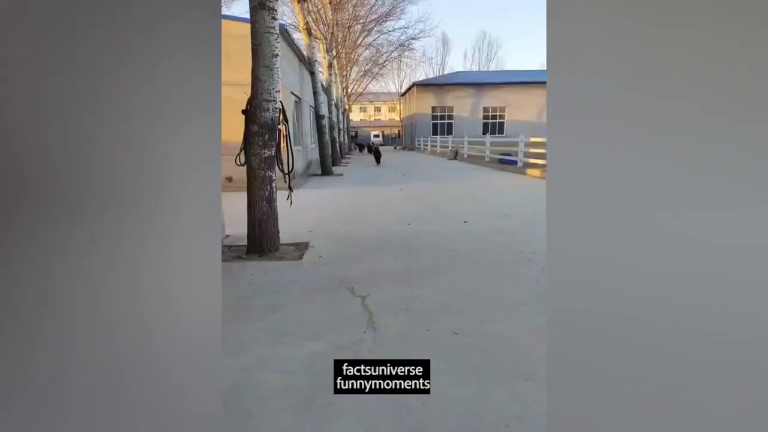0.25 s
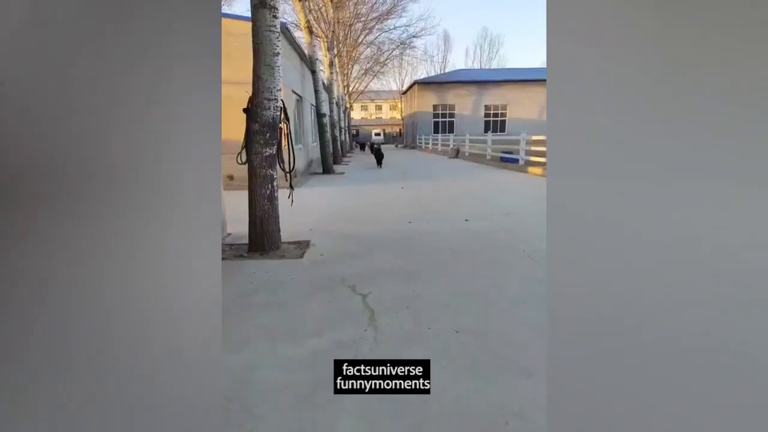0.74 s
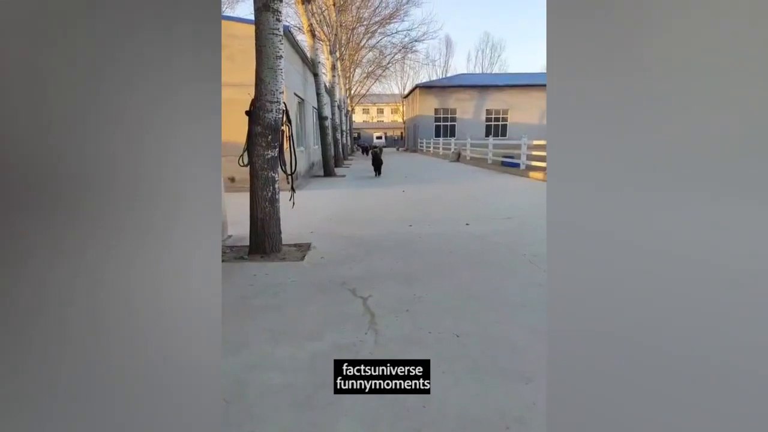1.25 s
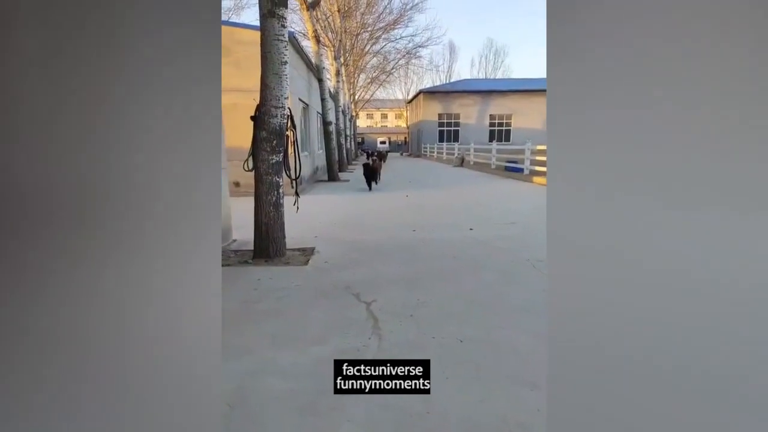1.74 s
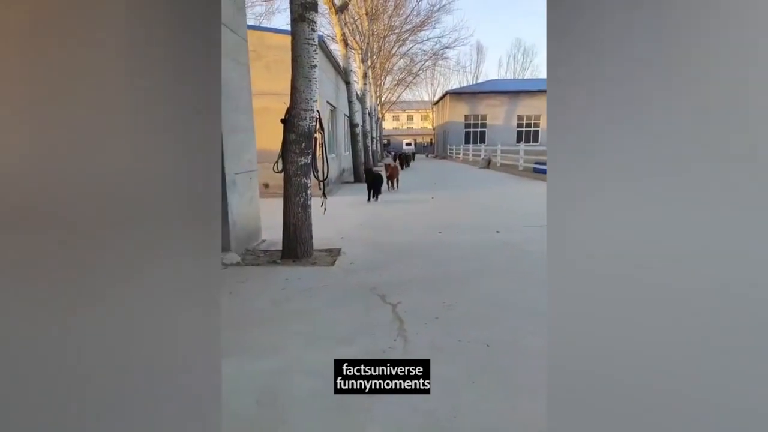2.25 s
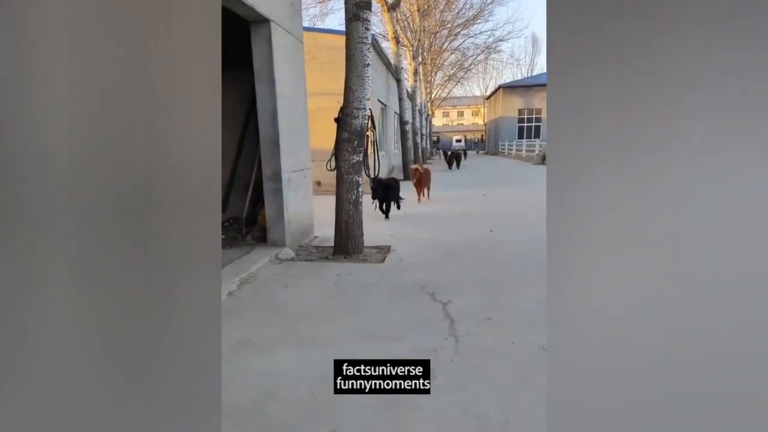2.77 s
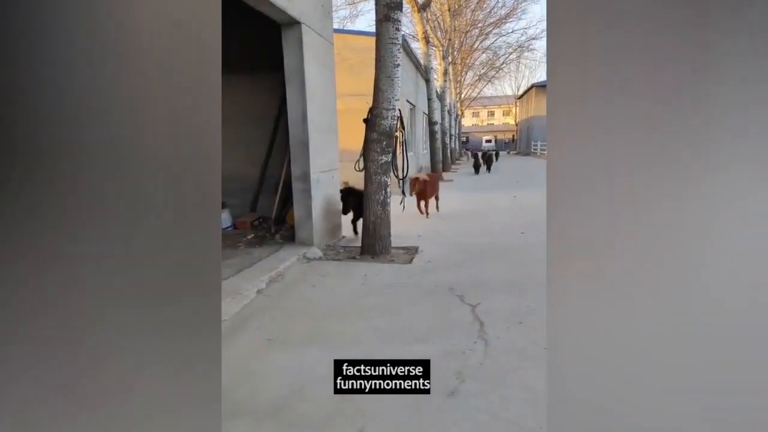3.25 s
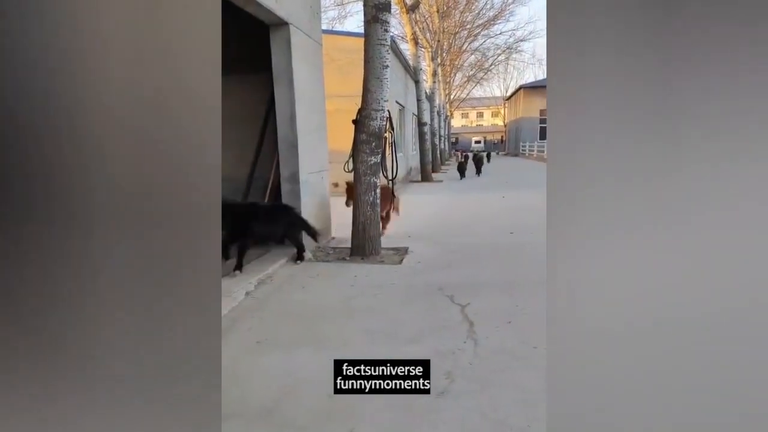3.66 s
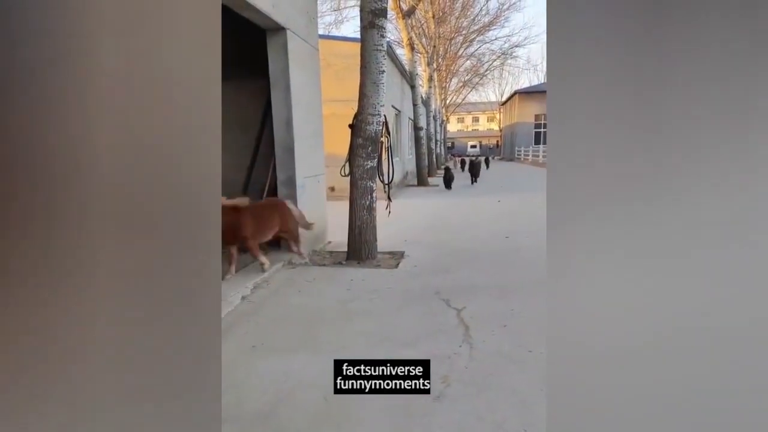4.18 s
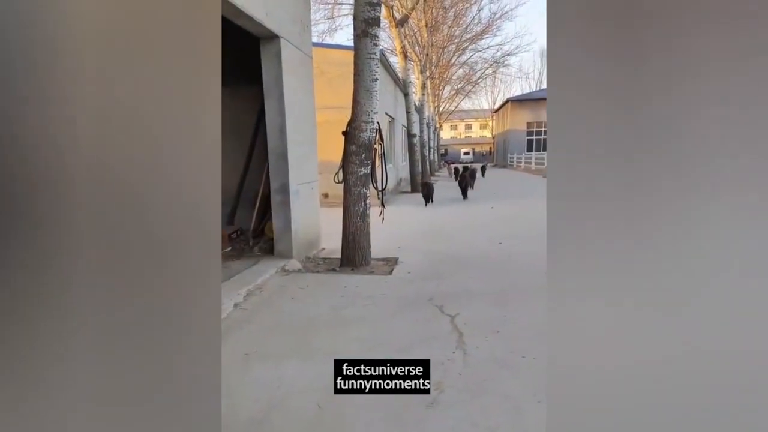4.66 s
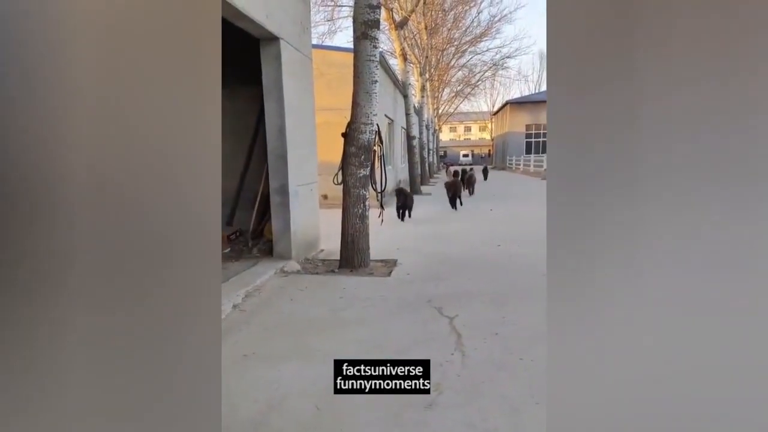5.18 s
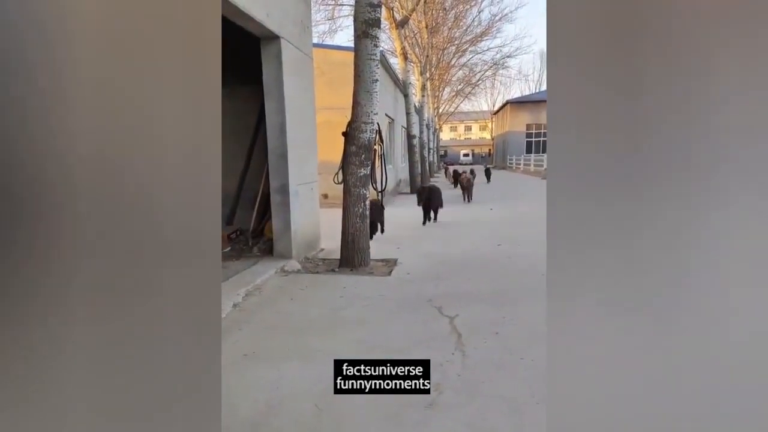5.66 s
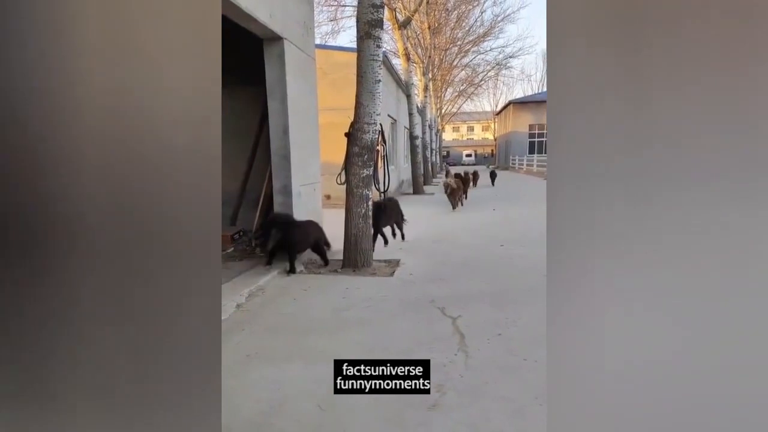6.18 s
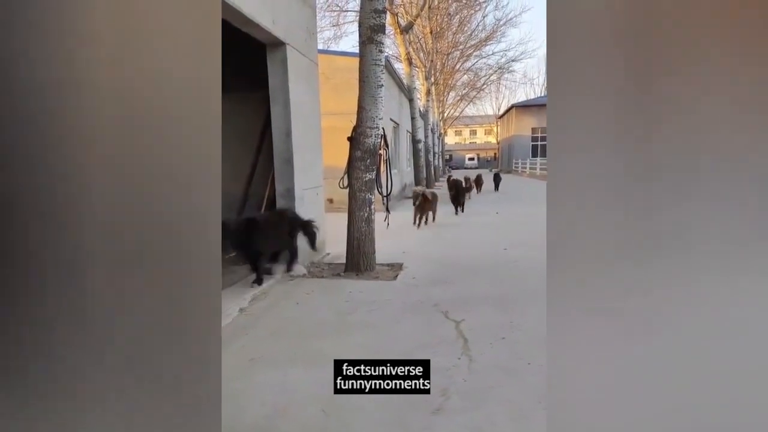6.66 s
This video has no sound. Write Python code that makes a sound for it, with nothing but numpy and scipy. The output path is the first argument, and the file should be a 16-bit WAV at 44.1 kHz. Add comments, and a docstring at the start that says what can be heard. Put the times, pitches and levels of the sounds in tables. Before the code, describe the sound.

A brief echoing corridor rush, silence, a low thump, then small horses' hooves clack along concrete and thud hollowly over a sill.

```python
"""Hooves clack and scuff along a concrete lane, with hollow thuds as small horses step onto a stable sill.
A short rush of noise in an echoing corridor comes first, then a silence and the thump of the input waking.
Hooves are uneven blows through broad resonances; thuds are sine pushes with a rough ring.
Delays between walls throw the near hooves back; coloured noise makes the far herd, rumble and corridor."""
import sys
import numpy as np
from scipy import signal
from scipy.fft import rfft, irfft, next_fast_len
from scipy.io import wavfile

SR = 44100
rng = np.random.default_rng(int(sys.argv[2]) if len(sys.argv) > 2 else 0)


def wrap_up_sound(samples):
    """Save the sound to the file named by the first command line argument, as 16-bit audio."""
    columns = np.atleast_2d(samples).T
    # keep every value between -1 and 1, then stretch to whole-number steps
    tamed = np.clip(columns, -1, 1)
    steps = np.round(tamed * 32767).astype(np.int16)
    wavfile.write(sys.argv[1], SR, steps)


N = 304951

# far herd spectrum, shape only: (frequency [Hz], density [dB per Hz])
HERD_SPECTRUM = [(240, -38), (400, -1.5), (763, 0), (1420, -3), (2220, -4), (3250, -6), (4300, -11),
                 (6560, -13), (10600, -21), (11500, -3), (22000, -120)]

CORRIDOR_END_S, SWITCH_ON_S = .1835, .3344


def from_db(db):
    """Decibels to gain."""
    return 10 ** (np.asarray(db) / 20)


def rms_one(x):
    """Scale to rms 1."""
    return x / np.sqrt(np.mean(x ** 2) + 1e-20)


def in_time(rows):
    """Interpolate table columns at every sample."""
    s, *columns = np.transpose(rows)
    return [np.interp(np.arange(N) / SR, s, c) for c in columns]


def drift(corner_hz):
    """Slow noise of rms 1: two equal poles at corner_hz, run at SR / 40 and interpolated."""
    step, settle = 40, 2000
    r = np.exp(-2 * np.pi * corner_hz * step / SR)
    noise = rng.standard_normal(N // step + settle + 2)
    slow = signal.lfilter([1], [1, -2 * r, r * r], noise)[settle:]
    return np.interp(np.arange(N) / step, np.arange(len(slow)), rms_one(slow))


def resonate(x, hz, width_hz):
    """One two-pole resonance, gain near 1 on top."""
    r = np.exp(-np.pi * width_hz / SR)
    zeros = (1 - r * r) / 2 * np.array([1, 0, -1])
    poles = [1, -2 * r * np.cos(2 * np.pi * hz / SR), r * r]
    return signal.lfilter(zeros, poles, x)


def body(force, hz, width_hz):
    """Two resonances in series, the second twice as wide: steeper skirts."""
    return resonate(resonate(force, hz, width_hz), hz, 2 * width_hz)


def high_pass(x, hz):
    """Cut the bass with a fourth-order slope."""
    return signal.sosfilt(signal.butter(4, hz, "high", fs=SR, output="sos"), x)


def bump(t, rise_ms, fall_ms):
    """Swell with its top at t = 0, 6 dB down after the rise and fall times."""
    return .5 ** ((1000 * t / np.where(t < 0, rise_ms, fall_ms)) ** 2)


def add(out, s, sound):
    """Mix a sound in at time s."""
    i = round(s * SR)
    out[i:i + len(sound)] += sound[:N - i]


def coloured(x, spectrum):
    """Filter a signal by a spectrum table, log-interpolated in frequency; rms 1."""
    size = next_fast_len(N)
    hz = np.arange(1, size // 2 + 2) * SR / size
    table_hz, level_db = np.transpose(spectrum)
    gain = from_db(np.interp(np.log(hz), np.log(table_hz), level_db, left=-90, right=-90))
    return rms_one(irfft(rfft(x, size) * gain, size)[:N])


def rumble(level_db):
    """Wavering low noise over a steady deep hum of the yard, itself noise."""
    # low rumble, shape only: (frequency [Hz], density [dB per Hz])
    low_spectrum = [(53, -27), (90, -0.5), (163, 0.5), (296, -4), (447, -15.5), (600, -19), (780, -20.5),
                    (1320, -120)]
    # deep hum, shape only: (frequency [Hz], density [dB per Hz])
    deep_spectrum = [(13, -40), (22, -2), (100, -7), (130, -26), (220, -120)]
    waver_db, waver_hz, deep_db = 1.5, 16, -44.5
    low = coloured(rng.standard_normal(N), low_spectrum)
    deep = coloured(rng.standard_normal(N), deep_spectrum)
    return from_db(level_db + waver_db * drift(waver_hz)) * low + from_db(deep_db) * deep


def flicker(x):
    """Treble above each edge gets its own drifting level."""
    # flickering bands: (lower edge [Hz], drift [dB rms], drift corner [Hz])
    treble_bands = [(3800, 3, 51), (7100, 4.5, 50)]
    for hz, db, corner_hz in treble_bands:
        treble = signal.sosfiltfilt(signal.butter(2, hz, "high", fs=SR, output="sos"), x)
        x = x + (from_db(db * drift(corner_hz)) - 1) * treble
    return rms_one(x)


def far_herd(level_db):
    """Steps too far to tell apart: random ticks in several bands over a noise wash, level lumpy."""
    # tick resonances, each favouring one hoof resonance: centre [Hz]
    tick_bands_hz = [800, 2000, 3200, 6500]
    ticks_per_s_per_band, tail_s, tick_share = 90, 0.0017, 0.41
    lump_db, lump_hz = 1.4, 14  # steps bunch up
    r, ticks = np.exp(-1 / (tail_s * SR)), 0
    for hz in tick_bands_hz:
        strikes = rng.random(N) < ticks_per_s_per_band / SR
        steps = strikes * from_db(2.5 * rng.standard_normal(N))
        puffs = rms_one(signal.lfilter([1], [1, -r], steps + 1e-18))
        ticks = ticks + resonate(puffs * rng.standard_normal(N), hz, 0.23 * hz)
    mix = tick_share * rms_one(ticks) + (1 - tick_share) * rng.standard_normal(N)
    wash = flicker(coloured(mix, HERD_SPECTRUM))
    return from_db(level_db + lump_db * drift(lump_hz)) * wash


def far_steps():
    """Steps down the lane blurred by the walls: noise puffs in herd colour plus a clack resonance."""
    # distant steps: (time [s], puff level [dB])
    puffs = [(0.418, -46), (0.476, -44.5), (0.713, -46), (0.801, -43), (0.862, -47.5), (1.054, -42),
             (1.129, -42.5), (1.205, -48), (1.393, -40), (1.471, -42), (1.64, -56), (1.714, -46.5),
             (4.569, -47.5), (5.028, -44), (6.38, -41.5), (6.57, -46)]
    rise_ms, fall_ms, clack_hz, clack_width_hz = 13.2, 31.5, 2200, 650
    swell, lead_s = np.zeros(N), .04
    puff = bump(np.arange(6000) / SR - lead_s, rise_ms, fall_ms)
    for s, db in puffs:
        add(swell, s - lead_s, from_db(db) * puff)
    clack = rms_one(resonate(rng.standard_normal(N), clack_hz, clack_width_hz))
    grain = from_db(2.9 * drift(220))  # many small echoes in each puff
    wash = coloured(rng.standard_normal(N), HERD_SPECTRUM)
    return swell * grain * rms_one(wash + 1.1 * clack)


def ringing():
    """Hard far clacks leave the lane ringing: narrow-band noise with exponential fades."""
    # lane rings: (time [s], level before fade [dB], pitch [Hz], fade time constant [s])
    tones = [(.469, -43, 2110, 0.071), (.803, -38, 1980, 0.02), (1.818, -34.5, 2060, 0.032),
             (2.153, -39, 1960, 0.041), (3.158, -31, 2070, 0.016), (3.49, -34, 1930, 0.017)]
    width_hz = 450
    out, t = np.zeros(N), np.arange(9000) / SR
    for s, db, hz, fade_s in tones:
        tone = rms_one(body(rng.standard_normal(len(t)), hz, width_hz))
        add(out, s, from_db(db) * np.exp(-t / fade_s) * tone)
    return out


def scrape():
    """Broad friction noise with narrow squeaks of drifting level."""
    # squeaks in the scrape: (pitch [Hz], level re friction before drift [dB])
    squeaks = [(950, -15.5), (1450, -7), (1900, -9), (2320, -4)]
    friction_hz, friction_width_hz, squeak_width_hz = 2700, 1330, 65
    notes = np.zeros(N)
    for hz, db in squeaks:
        level = from_db(db + 4.0 * drift(30))
        notes += level * rms_one(body(rng.standard_normal(N), hz, squeak_width_hz))
    friction = rms_one(body(rng.standard_normal(N), friction_hz, friction_width_hz))
    return rms_one(friction + notes)


def corridor():
    """Wide noise wash over a mono boom, with a brighter scrape swelling inside it."""
    # corridor levels: (time [s], rush [dB], scrape [dB], boom [dB]); rush and scrape drift further
    levels = [(0, -40.5, -64, -31.5), (.036, -41, -55, -42), (.054, -36.5, -41, -33), (.07, -39, -35, -52),
              (.098, -39.5, -41.5, -49), (.112, -36.5, -37, -40), (.126, -39, -42, -44),
              (.14, -39, -40.5, -49), (.18, -45, -51, -51)]
    # rush spectrum, shape only: (frequency [Hz], density [dB per Hz])
    rush_spectrum = [(100, -30), (250, -8.5), (900, -10.5), (2280, -15.5), (5900, -26.5), (8030, -32),
                     (8670, -67.5), (10600, -25.5), (11500, -44), (22000, -120)]
    side_db, wide_from_hz, boom_hz, boom_width_hz = -2.5, 290, 89, 57
    rush_db, scrape_db, boom_db = in_time(levels)

    def wash():
        rush = from_db(rush_db) * coloured(rng.standard_normal(N), rush_spectrum)
        return rush + from_db(scrape_db) * scrape()

    mid = wash()
    side = from_db(side_db) * high_pass(wash(), wide_from_hz)
    boom = from_db(boom_db) * rms_one(body(rng.standard_normal(N), boom_hz, boom_width_hz))
    return from_db(0.93 * drift(25)) * (mid + side * [[1], [-1]]) + boom


def walls(x):
    """Early slaps, then dulled feedback delays between buildings, other lengths each side; mid, side."""
    # near-wall slaps: (delay [s], gain [dB])
    slaps = [(.0077, -20.5), (0.0195, -15.5), (0.0309, -20.5)]
    t60_s, dull_above_hz, tail_db = 0.18, 4500, -15  # decay time before dulling
    out, dull = np.zeros((2, N)), np.exp(-2 * np.pi * dull_above_hz / SR)
    for k, lag in enumerate((rng.uniform(0.011, 0.031, 12) * SR).astype(int)):
        loop, gain, state = x.copy(), from_db(-60 * lag / SR / t60_s), [0.]
        for i in range(lag, N, lag):
            back, state = signal.lfilter([gain * (1 - dull)], [1, -dull], loop[i - lag:i], zi=state)
            loop[i:i + lag] += back[:N - i]
        out[k % 2] += (loop - x) * (-1) ** (k // 2)
    early = np.zeros(N)
    for delay_s, db in slaps:
        add(early, delay_s, from_db(db) * x)
    return early + from_db(tail_db) * (out[0] + out[1]), from_db(tail_db) * (out[0] - out[1])


def taps():
    """Light toe taps of the horses behind: a noise click rings one resonance over a faint broad edge."""
    # toe taps: (time [s], peak level [dB], pitch [Hz])
    clicks = [(0.4184, -37, 2580), (0.469, -30.5, 1980), (0.983, -32, 1670), (1.564, -32.5, 2370),
              (1.8044, -28, 2480), (2.064, -31.5, 3100), (2.0794, -30, 1980), (2.09, -33.5, 2200),
              (2.4096, -29, 3020), (2.7806, -33, 2930), (3.26, -29, 1930), (3.3397, -30, 2370),
              (3.4457, -31, 2970), (3.65, -29, 1850), (3.679, -32, 1760), (3.809, -27, 2370),
              (3.8235, -29, 2540), (3.9056, -32, 2330), (4.2866, -27, 2410), (4.536, -31, 2280),
              (4.562, -29, 2000), (5, -32, 1680), (5.007, -36, 2410), (5.086, -33, 3550),
              (5.092, -31.5, 2930), (5.1094, -28.5, 2200), (5.3442, -27.5, 2200), (5.6827, -30, 2830),
              (6.1787, -30, 2930), (6.2245, -26, 1780), (6.2493, -29, 3430), (6.422, -30, 1980),
              (6.5797, -36, 2800), (6.76, -29, 2860)]
    width_hz, half_ms, edge_db = 630, 1, -16
    out, lead_s = np.zeros(N), .003
    t = np.arange(600) / SR - lead_s
    for s, db, hz in clicks:
        force = bump(t, half_ms, half_ms) * rng.standard_normal(len(t))
        ring = rms_one(body(force, hz, width_hz)) + from_db(edge_db) * rms_one(force)
        add(out, s - lead_s, from_db(db) * ring / np.abs(ring).max())
    return out


def knocks():
    """Woody knocks of a hoof set down flat: two decaying sine modes, the upper weaker."""
    # flat knocks: (time [s], starting level of lower mode [dB], its pitch [Hz])
    strikes = [(.983, -37, 806), (1.805, -33, 940), (2.483, -31, 760), (3.35, -22.5, 724),
               (3.477, -30, 870), (3.510, -23.5, 750), (3.782, -26, 690), (3.996, -31.5, 820),
               (4.096, -27.5, 740), (4.243, -24.5, 490), (4.422, -24.5, 784), (4.430, -31, 905),
               (4.490, -34, 1130), (4.4995, -42, 1010), (6.231, -29, 530), (6.493, -28, 856),
               (6.671, -31.5, 790)]
    t60_s, upper_ratio, upper_db = .036, 1.45, -8
    out, t = np.zeros(N), np.arange(3000) / SR
    for s, db, hz in strikes:
        turn = 2 * np.pi * hz * t
        modes = np.sin(turn) + from_db(upper_db) * np.sin(upper_ratio * turn)
        add(out, s, from_db(db - 60 * t / t60_s) * modes)
    return out


def thuds():
    """Weight landing on the hollow sill: a swelling sine push, ground response, after-swing, rough ring."""
    # landings: (time [s], push level [dB], pitch [Hz], length re usual [ratio])
    landings = [(1.981, -30, 155, 1.3), (2.501, -29, 173, 1.2), (2.586, -29.5, 213, 1.5),
                (2.839, -28, 244, 0.91), (3.075, -24.5, 265, 1), (3.169, -27, 215, 0.64),
                (3.354, -24, 192, 1.5), (3.5123, -16, 227, 1.1), (3.5668, -7.5, 220, 1.85),
                (3.5752, -18.5, 200, .9), (3.6428, -15.5, 202, 1.1), (3.6549, -14, 206, 1.8),
                (3.6785, -6.5, 256, 1.87), (3.864, -22, 264, 1.1), (3.9015, -20.5, 153, 0.81),
                (3.9234, -27, 107, 2), (3.998, -25.5, 124, 1), (4.083, -18, 186, 0.52),
                (4.097, -16.5, 222, 0.99), (4.1096, -22, 170, 0.57), (4.1643, -23.5, 325, 0.5),
                (4.2484, -23, 377, 1), (4.425, -19, 308, 1.6), (4.495, -25, 153, 1.1),
                (4.502, -28, 246, 0.89), (4.656, -28.5, 133, 3), (6.1677, -21.5, 122, 1.2),
                (6.2288, -11, 245, 1.4), (6.414, -27.5, 201, 1), (6.4694, -22, 212, 0.78),
                (6.496, -23.5, 328, 1.8), (6.6207, -15.5, 244, 1.6), (6.842, -23, 282, 1.1)]
    rise_cycles, fall_cycles = 0.47, 0.45  # to -6 dB at length 1
    overtone_ratio, overtone_db = 2.98, -24
    ground_ratio, ground_db, ground_stretch = 0.402, -15, 3.2  # lower and slower
    after_db, after_s = -20.5, 0.014  # the sill keeps swinging
    ring_db, ring_rise_s, ring_s = -9.5, 0.002, 0.0065
    out, lead_s = np.zeros(N), .04
    t = np.arange(6000) / SR - lead_s
    for s, db, hz, length in landings:
        rise_ms = 1e3 * length * rise_cycles / hz
        fall_ms = 1e3 * length * fall_cycles / hz
        turn = 2 * np.pi * hz * t
        push = np.sin(turn) + from_db(overtone_db) * np.sin(overtone_ratio * turn)
        push *= bump(t, rise_ms, fall_ms)
        ground = bump(t / ground_stretch, rise_ms, fall_ms) * np.sin(ground_ratio * turn)
        after = np.clip(1e3 * t / fall_ms / 2, 0, 1) * np.exp(-t / after_s) * np.sin(turn)
        rough = rms_one(resonate(resonate(rng.standard_normal(len(t)), hz, 110), hz, 190))
        ring = rough * np.clip(t / ring_rise_s, 0, 1) * np.exp(-t / ring_s)
        thud = push + from_db(ground_db) * ground + from_db(after_db) * after + from_db(ring_db) * ring
        add(out, s - lead_s, from_db(db) * thud)
    return out


def hooves():
    """Each contact: a noise blow with a click, then a scuff, ringing clack, clop and grit resonances."""
    # near contacts: (time [s], clack level [dB], clack pitch [Hz],
    #   brightness [dB, toe-first gritty + / flat dull -], blow fall to -6 dB [ms])
    contacts = [(1.8163, -30, 1700, -9, 0.8), (1.827, -39, 1990, 8, 0.67), (1.966, -42, 2020, 4, 0.84),
                (2.048, -34.5, 3220, -5, 1), (2.15, -30, 1820, -4, 4.1), (2.304, -36, 2190, 7, 0.89),
                (2.3809, -30, 3040, -2.5, 4.3), (2.481, -35, 2900, 1, 1.5), (2.488, -32.5, 2150, 2.5, 3.3),
                (2.502, -35, 3130, -5, 0.33), (2.5729, -29, 1770, -1.5, 0.55),
                (2.6511, -25.5, 2010, 2, 0.61), (2.7207, -34.5, 2730, 2.5, 4.8),
                (2.731, -27.5, 3400, 1, 2.5), (2.756, -29, 2270, -6.5, 1.3), (2.77, -39, 2440, -3, 0.83),
                (2.8197, -28, 2200, -4.5, 0.81), (2.829, -30, 2140, 2, 8.2), (2.9081, -29.5, 2240, 1, 0.87),
                (2.9802, -33, 2420, 4.5, 0.66), (3.064, -35.5, 3100, -4.5, 3.3),
                (3.081, -27.5, 1680, 5.5, 0.54), (3.149, -31, 2410, -2, 4.5), (3.162, -30.5, 2200, 1, 6.4),
                (3.2448, -37, 2500, 8, 0.77), (3.3, -27, 2000, -1, 1.4), (3.352, -31.5, 3020, 2, 1.5),
                (3.3627, -39, 3010, 7, 0.62), (3.3884, -48, 3170, -1, 0.49), (3.4082, -28, 2270, -3, 0.52),
                (3.413, -25, 2060, -1, 0.55), (3.4781, -30.5, 2520, -12, 0.61),
                (3.4879, -24, 2390, 5, 0.52), (3.511, -29.5, 2200, -1, 1), (3.641, -33.5, 1770, 2, 1.6),
                (3.7457, -52, 2980, -4, 0.57), (3.767, -20, 2170, -0.5, 1.3), (3.7722, -28, 2220, -1, 1.9),
                (3.7829, -27, 3150, -5, 0.66), (3.8624, -40, 2600, -8, 1.1),
                (3.9527, -33.5, 1720, -13, 0.46), (3.965, -33, 2300, 3.5, 0.62),
                (3.974, -31.5, 3440, -2, .6), (4.096, -21.5, 1700, 2.5, 0.94),
                (4.1632, -24, 2380, -3.5, 0.84), (4.168, -35, 3000, -2, 0.81), (4.205, -32, 2650, 2, 0.55),
                (4.2415, -23, 2610, 1, 4.3), (4.2935, -36, 3360, 0, 1), (4.3065, -31.5, 3380, 5, 1.3),
                (4.422, -29.5, 3720, 1, 1.1), (4.4297, -37.5, 2150, -3, 1.5),
                (4.492, -29.5, 1520, -12, 0.71), (4.6137, -33, 2950, -1, 1.1), (4.6289, -34, 2500, 0, 1.8),
                (4.639, -31.5, 3450, 1, 1.1), (4.7067, -34, 3580, 7.5, 0.67), (4.7853, -35, 3900, 4, 1.7),
                (4.9282, -35.5, 1880, -1.5, 0.82), (4.9429, -29, 2200, -2, 0.72),
                (4.9504, -36, 2230, 8.5, 1.9), (4.9707, -40, 3400, -2, .7), (4.9858, -32, 2220, -1, 0.49),
                (5.062, -38.5, 3200, 15, 0.49), (5.149, -34.5, 3420, 9, 0.83), (5.216, -43, 3370, 7, 0.77),
                (5.265, -28, 2560, 6.5, 0.68), (5.2776, -24, 2850, 2, 0.69), (5.3517, -37.5, 2380, 10, 3.2),
                (5.425, -31, 3300, 0, 0.86), (5.436, -38, 2930, 9, 2.1), (5.519, -30, 3120, 8, 0.34),
                (5.5352, -30.5, 3620, 8, 0.77), (5.5955, -23.5, 3270, 7, 0.42),
                (5.6067, -34.5, 3200, -3.5, 2), (5.69, -30, 3420, 6, 0.69), (5.713, -31.5, 2200, -5.5, 1.6),
                (5.7844, -33, 3070, 1.5, 2.4), (5.863, -31.5, 3300, 0, 1.3), (5.879, -29.5, 3270, 11, 0.53),
                (5.9158, -28.5, 3300, 1.5, .55), (5.952, -38, 3200, -3, 0.64),
                (6.0158, -28, 2340, -4, 0.54), (6.0738, -25.5, 2120, -2, 1.54),
                (6.1449, -26.5, 3560, 9.5, 0.53), (6.156, -37, 2300, -7, 1.3),
                (6.237, -32.5, 3360, -1, 2.3), (6.295, -35.5, 2720, -4, 0.6), (6.3745, -32, 3270, -5, 0.59),
                (6.4098, -24.5, 1960, 0.5, 1), (6.4936, -28.5, 3260, 5.5, 0.6),
                (6.4989, -34, 2140, -5, 1.3), (6.535, -24.5, 2400, -3.5, 1.7), (6.672, -39, 1950, 11, 1.1),
                (6.6997, -33, 3520, 1, 0.66), (6.749, -33, 2900, 12, 1.1), (6.767, -25, 2200, -3, 0.72),
                (6.8243, -27.5, 1850, -4, 1.1), (6.842, -33.5, 2200, 9.5, 1.4),
                (6.8987, -13, 2140, -3.5, 1.1), (6.9062, -49, 2380, -5, 0.66)]
    # click and scuff shares [gain] of clack, clop, grit
    snap_shares, scuff_shares = [1, 1, 0.42], [1, 1, 0.83]
    clop_hz, widths_hz = 645, (1340, 1000, 2250)
    grit_mid_hz, grit_spread = 6000, .13  # grit size varies by contact; spread in log frequency
    clop_re_clack_db, grit_re_clack_db, rise_ms = -5, -8, 0.59  # levels at brightness 0
    snap_db, snap_ms = 24, 1.5  # horn meets concrete; strongest in quick contacts
    scuff_db, scuff_s, touch_s = -12, 0.014, .0011  # dB at usual level and 1 ms; dust brushed after / before
    dryness, usual_db = 0.6, -34.5  # harder blows land squarely: less scuff per dB above usual
    grain_db, grain_hz = 5.0, 250  # scuff stutters over grit
    clack_ring_width_hz, clack_ring_db = 300, -0.5
    out, lead_s = np.zeros(N), .015
    t = np.arange(2500) / SR - lead_s
    click = np.arange(len(t)) == round(lead_s * SR)
    drag = np.exp(np.where(t < 0, t / touch_s, -t / scuff_s))
    stutter = np.append(from_db(grain_db * drift(grain_hz)), np.ones(len(t)))
    for s, db, hz, bright_db, fall_ms in contacts:
        grit_hz = grit_mid_hz * np.exp(grit_spread * rng.standard_normal())
        levels_db = (0, clop_re_clack_db - bright_db, grit_re_clack_db + bright_db)
        blow = bump(t, rise_ms, fall_ms)
        snap = from_db(snap_db) * np.exp(-(rise_ms + fall_ms) / (2 * snap_ms)) * click
        # quick blows drag least
        scuff = from_db(scuff_db - dryness * (db - usual_db)) * np.sqrt(rise_ms + fall_ms)
        scuff = scuff * drag * stutter[round(s * SR):][:len(t)]
        bands = zip((hz, clop_hz, grit_hz), widths_hz, levels_db, snap_shares, scuff_shares)
        for centre_hz, width_hz, level_db, snap_share, scuff_share in bands:
            blow_noise, scuff_noise = rng.standard_normal((2, len(t)))
            ring = body(snap_share * snap + blow * blow_noise, centre_hz, width_hz)
            # the hoof wall sings briefly on the clack note
            ring += from_db(clack_ring_db) * resonate(ring, hz, clack_ring_width_hz)
            ring *= np.sqrt(np.sum(blow ** 2) / np.sum(ring ** 2))  # same energy as the blow envelope
            ring += scuff_share * scuff * rms_one(body(scuff_noise, centre_hz, width_hz))
            add(out, s - lead_s, from_db(db + level_db) * ring)
    return out


def scene():
    """Corridor, silence, then the lane: nearly mono, a little wide in the treble."""
    # lane background: (time [s], far herd [dB], rumble [dB]); each level wavers further
    lane_levels = [(0.5, -47.5, -41.5), (0.68, -52, -40.5), (1.87, -47.5, -42.5), (3.19, -46.5, -40.5),
                   (3.39, -44.5, -40), (3.66, -43.5, -36), (4.36, -45, -42), (4.77, -46.5, -36),
                   (6.5, -43.5, -41.5), (6.91, -42.5, -37.5)]
    hoof_top_hz, width_db, width_from_hz, side_lag_s = 9140, -26.5, 2000, .0006
    t = np.arange(N) / SR
    herd_db, rumble_db = in_time(lane_levels)
    low_pass = signal.butter(4, hoof_top_hz, fs=SR, output="sos")
    near = signal.sosfilt(low_pass, hooves() + taps() + knocks())
    echo_mid, echo_side = walls(near)
    background = rumble(rumble_db) + far_herd(herd_db) + far_steps() + ringing()
    mid = background + near + echo_mid + thuds()
    side = echo_side + np.roll(mid, round(side_lag_s * SR))  # a faint delayed copy widens the treble
    side = from_db(width_db) * high_pass(side, width_from_hz)
    lane = mid + side * [[1], [-1]]
    return lane * (t > SWITCH_ON_S) + corridor() * (t < CORRIDOR_END_S)


def record(dry):
    """The input wakes with an offset that steps once and settles slowly; the top is cut."""
    # input offset terms: (height before smoothing [full scale], time constant [s])
    offset_terms = [(.45, .38), (-.56, .13)]
    step_height, step_s, edge_hz, cutoff_hz = -.11, .0395, 3000, 11600
    t = np.arange(N) / SR - SWITCH_ON_S
    offset = step_height * (t < step_s)
    for height, tau_s in offset_terms:
        offset = offset + height * np.exp(-np.maximum(t, 0) / tau_s)
    r = np.exp(-2 * np.pi * edge_hz / SR)
    offset = signal.lfilter([1 - r], [1, -r], offset * (t > 0))
    return signal.sosfilt(signal.cheby2(12, 50, cutoff_hz, fs=SR, output="sos"), dry + offset)


dry = scene()
out = record(dry)
wrap_up_sound(out)
```